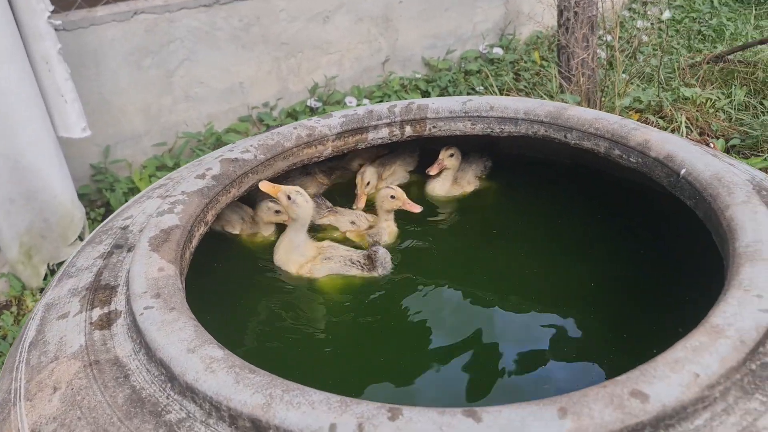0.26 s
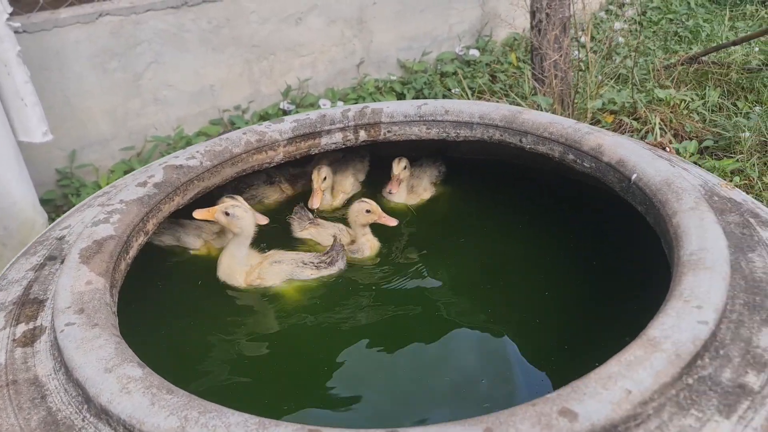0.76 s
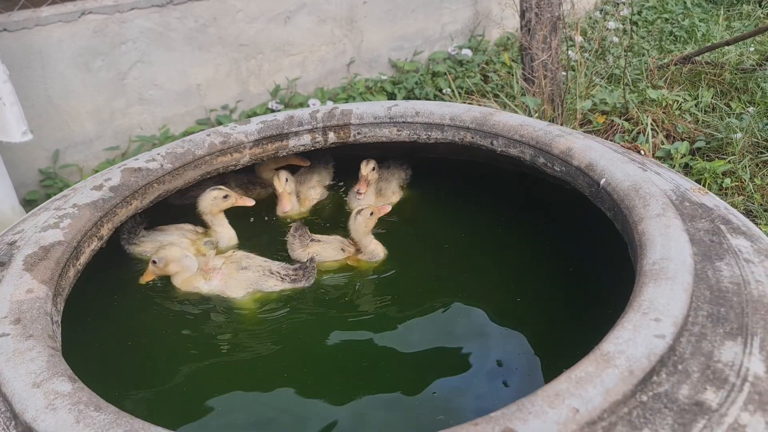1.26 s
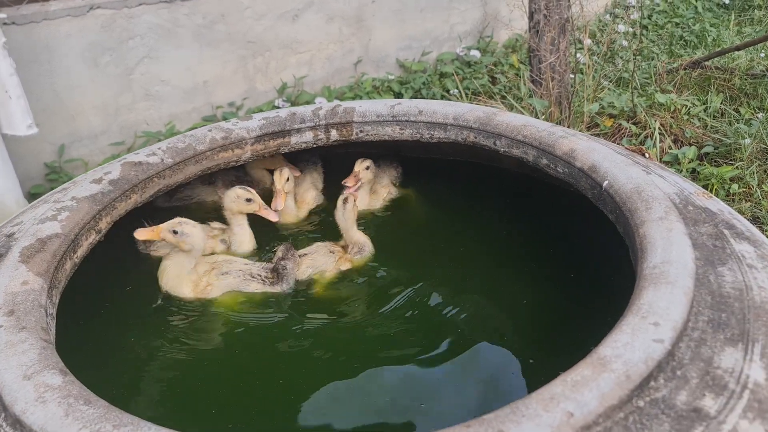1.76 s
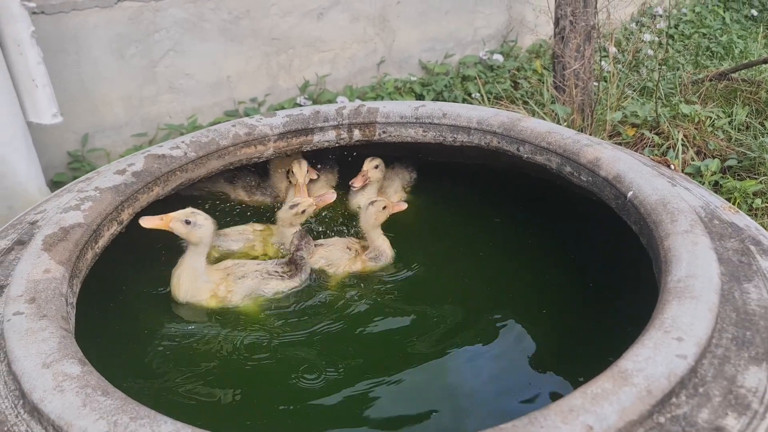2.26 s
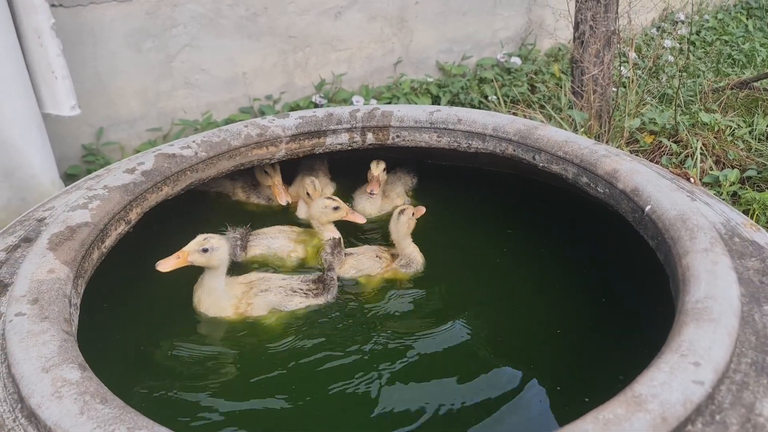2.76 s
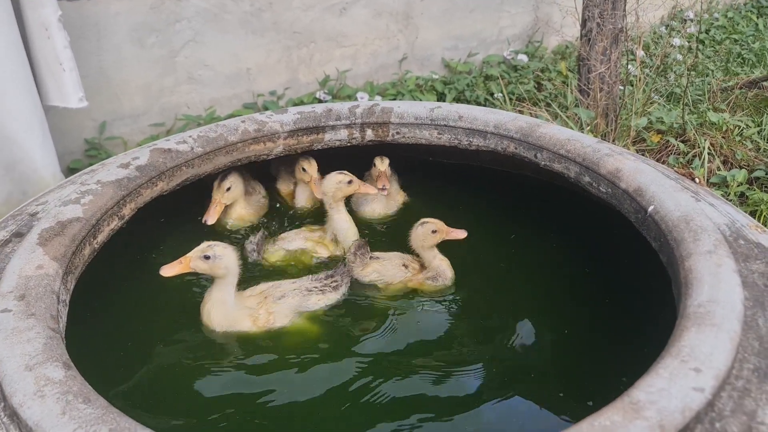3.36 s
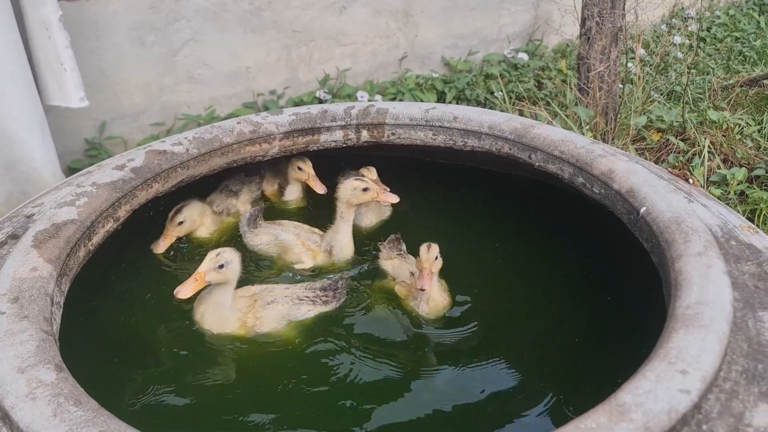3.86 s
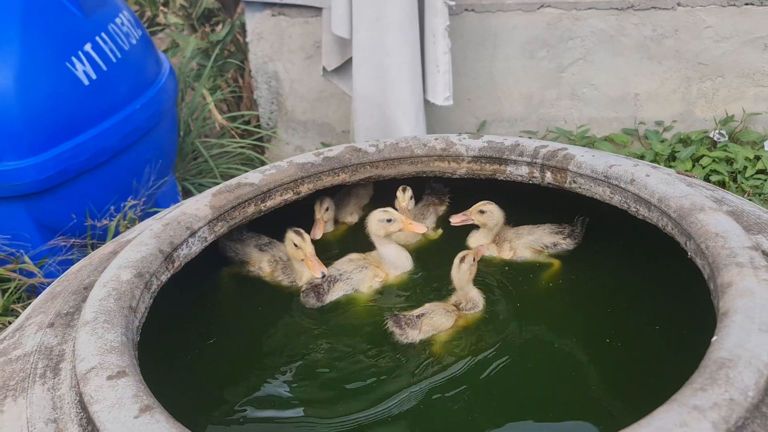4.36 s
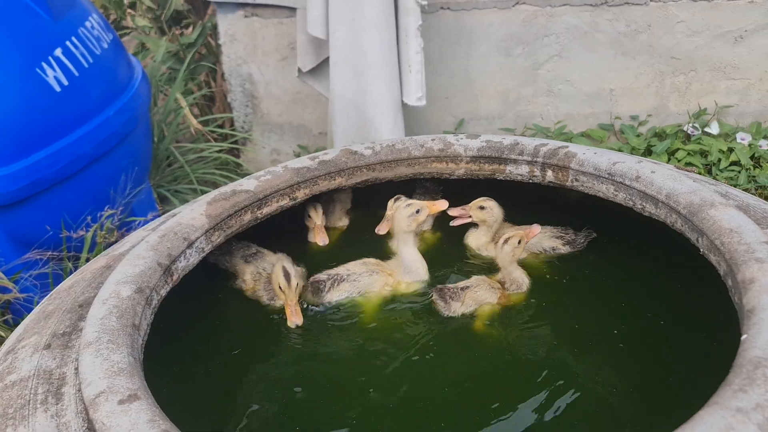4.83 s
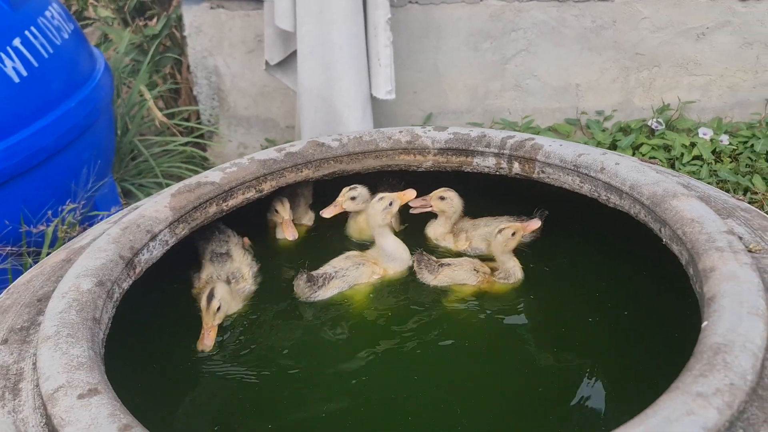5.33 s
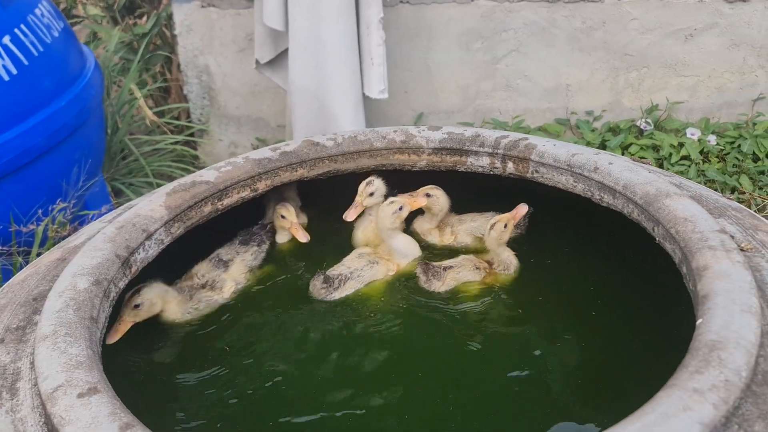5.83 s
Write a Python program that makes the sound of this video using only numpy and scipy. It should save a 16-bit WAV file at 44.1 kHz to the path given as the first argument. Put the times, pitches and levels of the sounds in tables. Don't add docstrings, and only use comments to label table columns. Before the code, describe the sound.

Ducklings paddling in a water-filled clay jar: regular piercing peeps, a sharp splash, tiny bill ticks, then higher sibling cries, outdoors and close.

```python
import sys
import numpy as np
from scipy import signal
from scipy.fft import rfft, irfft, next_fast_len
from scipy.io import wavfile
from scipy.ndimage import uniform_filter1d, map_coordinates

SR = 44100
rng = np.random.default_rng(int(sys.argv[2]) if len(sys.argv) > 2 else 0)


def volts(x):
    e = np.asarray(x, float) / 20
    return 10 ** e


def wav_out(sig):
    wavfile.write(sys.argv[1], SR, np.round(np.clip(np.atleast_2d(sig).T, -1, 1) * 32767).astype(np.int16))


N = 268569
T = np.arange(N) / SR
GAP_START_S, GAP_END_S = 3.955, 3.999
EAR = np.array([[1], [-1]])
LAG_S = 0.0001


def unit(x):
    return x / np.sqrt(np.mean(x ** 2) + 1e-20)


def along(points, hz):
    f, v = np.transpose(points)
    return np.interp(np.log(hz + 1), np.log(f + 1), v)


def wobble(rate):
    knots = rng.standard_normal(int(N * rate / SR) + 4)
    return map_coordinates(knots, [T * rate])


def filtered(x, response):
    m = next_fast_len(x.shape[-1] + 8192)
    spectrum = rfft(x, m) * response(np.fft.rfftfreq(m, 1 / SR))
    return irfft(spectrum, m)[..., :x.shape[-1]]


def coloured(x, points):
    return filtered(x, lambda hz: volts(along(points, hz)))


def sides(pan_db):
    g = volts(np.array([pan_db / 2, -pan_db / 2]))
    return (g / np.sqrt(np.mean(g ** 2)))[:, None]


def add(out, s, x):
    part = out[:, round(s * SR):][:, :x.shape[-1]]
    part += x[..., :part.shape[1]]


# (f/Hz, correlation)
PORT_LIKENESS = [(25, .75), (60, 0.93), (240, 0.74), (950, -0.46), (3770, 0.17), (15000, 0.01)]


def rush(spectrum, patchy_db):
    z = signal.stft(rng.standard_normal((2, N + 512)), nperseg=512)[2]
    field = uniform_filter1d(rng.standard_normal(z.shape[1:]), size=5, axis=0)
    field = uniform_filter1d(field, size=10, axis=1)
    pair = signal.istft(z * volts(patchy_db * unit(field)), nperseg=512)[1][:, :N]

    def mid_side(hz):
        turn = np.arccos(np.clip(along(PORT_LIKENESS, hz), -1, 1)) / 2
        return volts(along(spectrum, hz)) * [np.cos(turn), np.sin(turn)]

    mid, side = filtered(pair, mid_side)
    return unit(np.array([mid + side, mid - side]))


# (f/Hz, level/dB per Hz)
TRAFFIC = [(88, -38), (150, -19), (221, -16.5), (396, -13), (454, -17), (491, -11.5), (768, -14),
           (1320, -19.5), (2110, -23), (2610, -19), (3110, -18.5), (11000, -45.5), (13000, -50),
           (15600, -52)]
# (f/Hz, level/dB per Hz)
TYRES = [(70, -40), (100, -3), (130, 0), (165, -5), (210, -40)]
# (f/Hz, level/dB per Hz)
CHATTER = [(1800, -30), (2500, -19), (2900, -5), (3700, -12), (4500, 6), (5200, -15.5)]


def traffic_and_birds():
    before = T < GAP_END_S
    traffic = volts(np.where(before, -58, -54)) * rush(TRAFFIC, patchy_db=3.0)
    birds = volts(np.where(before, -68.5, -58)) * rush(CHATTER, patchy_db=5)
    tyres = volts(-59) * (T < GAP_START_S) * rush(TYRES, patchy_db=2.5)
    return traffic + birds + tyres


# (t/s, level/dB)
MOTOR = [(0.0, -55), (0.13, -53), (0.29, -67.5), (0.52, -36), (0.81, -57), (0.95, -37.5), (1.41, -58.5),
         (1.8, -50), (2.63, -61), (2.76, -34.5), (3.1, -54.5), (4.07, -52), (4.16, -32), (5.0, -46),
         (5.22, -38), (5.85, -55.5), (6.0, -33), (6.09, -41)]
# (f/Hz, level/dB per Hz)
RUMBLE = [(12, -54), (20, -33), (45, -1), (65, 3), (135, -11), (195, -21), (214, -20), (260, -24.5),
          (340, -55), (570, -120)]
# (from t/s, to t/s, f/Hz, level/dB)
DRONES = [
    (0, 1.8, 397, -69),
    (0, 1.66, 494.6, -78.5),
    (2.2, 3.1, 602, -69.5),
    (3.15, 3.6, 528, -68.5),
]


def motors():
    hum_db = np.interp(T, *np.transpose(MOTOR))
    speed_hz = 82.4 + 1.5 * wobble(6.0)
    out = volts(hum_db + 2.5 + 1.5 * wobble(13)) * np.sin(2 * np.pi * np.cumsum(speed_hz) / SR)
    for start, end, hz, db in DRONES:
        out = out + volts(db + 1.4 * wobble(9.9)) * (T > start) * (T < end) * np.sin(2 * np.pi * hz * T)
    rumble_db = -45 + 0.11 * (hum_db - hum_db.mean())
    return out + volts(rumble_db) * rush(RUMBLE, patchy_db=3.0)


# (f/Hz, level/dB per Hz)
WINGS = [(9500, -28), (10300, -8), (10800, -0.5), (11500, -6.5), (12200, -29)]


def insect():
    swell = np.clip(((T - .285) % .632) / 0.095, .3, 1)
    strokes = 1 + 0.48 * np.sin(2 * np.pi * 95 * T)
    return volts(-74) * swell * strokes * rush(WINGS, patchy_db=-1.4)


# (f/Hz, level/dB per Hz)
HISS = [(2350, -33.5), (4000, -13), (4590, -10.5), (7660, -14.5), (8890, -34), (10900, -15.5), (15600, -17)]
SWISH = [(150, -44), (250, -10.5), (504, -12), (579, -11), (968, -17), (2740, -8), (5000, -12.5),
         (6500, -44.5), (11000, -120)]
# (from t/s, peak t/s, to t/s, hiss level/dB, body level/dB)
SHAKES = [
    (1.022, 1.131, 1.3, -62, -76.5),
    (4.0, 4.23, 4.43, -60, -59),
]


def feathers():
    hiss, swish, out = rush(HISS, patchy_db=-2.0), rush(SWISH, patchy_db=2.5), np.zeros((2, N))
    hiss = unit(hiss * volts(3.0 * wobble(250)))
    for start, peak, end, hiss_db, body_db in SHAKES:
        swell_db = np.interp(T, [start, peak, end], [-12, 0, -12])
        edge = np.clip(np.minimum(T - start, end - T) / 0.035, 0, 1)
        out += edge * volts(swell_db) * (volts(hiss_db + 12.5) * hiss + volts(body_db + 22.5) * swish)
    return out


# (f/Hz, level/dB, t60/s)
CLAY = [(343, 0, 0.28), (496, 3.5, 0.15), (634, 3, 0.17), (748, -31, 0.35), (975, -31, 0.072),
        (1410, -18, 0.05)]


def knock():
    out, t = np.zeros((2, N)), np.arange(SR // 5) / SR
    clay = sum(volts(db - 60 * t / t60) * np.sin(2 * np.pi * hz * t) for hz, db, t60 in CLAY)
    add(out, 5.617, volts(-38) * clay * sides(-2.6))
    return out


# (t/s, peak level/dB, f/Hz, t60/s, rise share)
BUBBLES = [(0.269, -49, 343, 0.082, 0.089), (.642, -39.5, 1710, 0.024, 0.11),
           (0.659, -40, 1350, 0.02, 0.13), (.853, -52.5, 700, .04, 0.14),
           (1.159, -47.5, 1640, 0.028, 0.092), (2.002, -34, 707, 0.064, 0.06),
           (2.007, -38.5, 1245, 0.047, .05), (2.078, -30.5, 581, .12, 0.18),
           (2.079, -36.5, 1110, 0.04, 0.061), (2.127, -35, 1160, 0.052, 0.5),
           (2.652, -39.5, 1324, 0.024, .1), (3.127, -22.5, 1354, 0.044, 0.056),
           (3.6, -56, 748, 0.16, 0.018), (4.15, -50, 590, .12, .03), (4.25, -44, 395, .16, -.03)]


def bubbles():
    out, t = np.zeros((2, N)), np.arange(SR // 5) / SR
    for s, db, hz, t60, rise in BUBBLES:
        ring = np.sin(2 * np.pi * hz * (t + rise * t * t / t60)) * (1 - np.exp(-t / 0.0022))
        add(out, s, volts(db + 5.0 - 60 * t / t60) * ring * sides(-5.0))
    return out


# (f/Hz, level/dB)
SPRAY = [(2000, -18.5), (3000, -2.5), (4500, 7), (7000, -15), (9500, -30), (12000, -24), (16000, -22)]
SLAP = [(400, -20), (800, 3.5), (1400, 5.5), (2200, -2.5), (3000, -25.5)]
# (t/s, peak level/dB, slap level/dB, left-right level/dB, t60/s)
SPLASHES = [(0.3325, -40.5, -12.5, -8, 0.036), (0.35, -47, -23, -4.5, 0.047),
            (0.461, -45.5, -6.5, -7.5, 0.035), (0.5139, -54, 4, -7, 0.04), (0.8509, -36.5, -4, -4.5, 0.04),
            (0.937, -52.5, 2.5, -3.5, 0.05), (1.0349, -47, -2.5, -1, 0.046),
            (1.0594, -45, -10.5, -4.5, 0.031), (1.288, -40.5, -19, -4, 0.04),
            (1.3034, -34, -30.5, -17.5, 0.031), (1.6596, -40.5, -20.5, -4, 0.026),
            (1.994, -50, 6.5, -10, 0.047), (2.2746, -37, -33, -15, 0.035), (3.0897, -50, -20, -8, 0.02),
            (3.1245, -18.5, -5.5, -8.5, 0.044), (3.1344, -23.5, -4, -8.5, 0.053),
            (3.1588, -32, -8.5, -4, 0.031), (3.2125, -39, -10, -4, .04), (3.2305, -36, -19, -3.5, 0.062),
            (4.6945, -32.5, -24.5, -7, 0.021), (4.9882, -58, -11, -8, 0.024),
            (5.0399, -34.5, -18, -2, 0.032), (5.216, -31.5, -21, -0.5, 0.034),
            (5.616, -52.5, 4, -12.5, 0.029)]


def splashes():
    out, t = np.zeros((2, N)), np.arange(SR // 5) / SR
    for s, db, slap_db, pan_db, t60 in SPLASHES:
        noise = rng.standard_normal((3, len(t)))
        spikes_db = 1.8 * rng.standard_normal(len(t) // 40 + 1).repeat(40)[:len(t)]
        grains = (noise[0] + .45 * noise[1:]) * volts(spikes_db)
        burst = unit(coloured(grains, SPRAY)) + volts(slap_db) * unit(coloured(grains, SLAP))
        envelope = volts(db + 1.5 - 60 * t / t60) * (1 - np.exp(-t / 0.0022))
        add(out, s - .002, envelope * burst * sides(pan_db))
    return out


# (f/Hz, level/dB)
SNAP = [(2500, -25), (5000, -4), (8000, -2), (9500, -8), (12000, -3), (15000, 0), (16000, -10)]
# (t/s, peak level/dB, t60/s)
TICKS = [(0.5147, -57, 0.018), (1.6586, -47, 0.018), (2.3306, -45, 0.018), (2.4049, -40, 0.018),
         (3.1253, -36, 0.018), (3.2321, -48, 0.018), (3.7633, -51, 0.018), (4.6932, -51, 0.018),
         (4.9781, -55, 0.018), (5.0424, -48, 0.018), (5.1744, -53, 0.018), (5.216, -42, 0.018),
         (5.2659, -52, 0.018), (5.6166, -50, 0.018)]


def ticks():
    out, t = np.zeros((2, N)), np.arange(SR // 20) / SR
    for s, db, t60 in TICKS:
        noise = rng.standard_normal((3, len(t)))
        snap = unit(coloured(noise[0] + .6 * noise[1:], SNAP))
        add(out, s - .001, volts(db - 3 - 60 * t / t60) * (1 - np.exp(-t / .0007)) * snap)
    return out


def call(row, head, tones, shape, flap, depth):
    s, length, hz, climb, db = row
    swell_db, pan_db, lead_us, settle_hz, arch_db = head
    (db2, pan2, rad2, db5), (db3, pan3, rad3, rad5) = tones
    (over_hz, over_s, settle_s), (soft_s, soft_db, attack_s), (drop_hz, drop_s, fade_db) = shape
    at = slice(round((s - .01) * SR), round((s + length + .004) * SR))
    t, beat = T[at] - s, flap[at]
    rising = np.clip((t - soft_s) / attack_s, 0, 1)
    ending = np.clip(1 + (t - length) / drop_s, 0, 2)
    depth = depth[at] + .4 * np.maximum(1 - rising, np.minimum(ending, 1))

    sharp = 2.4

    def jerk(late_rad):
        return np.exp(sharp * (np.cos(beat - late_rad) - 1))

    overshoot = over_hz * np.exp(-((t - .004) / over_s) ** 2 / 2)
    settling = settle_hz * np.clip(1 - abs(t) / settle_s, 0, 1) ** 2
    pitch = hz + climb * t + overshoot + settling - drop_hz * ending ** 2.6
    pitch = pitch + depth * 520 * (jerk(0) - 1 / np.sqrt(2 * np.pi * sharp))
    phase = 2 * np.pi * np.cumsum(pitch) / SR

    level = db + soft_db * (1 - rising) + swell_db * (t / length - .5) + fade_db * ending ** 2
    level = level + arch_db * (.5 - (2 * t / length - 1) ** 2)
    level = level + 1.5 * np.exp(-((t - soft_s - attack_s) / .005) ** 2 / 2)
    strength = 1 + depth * (.2 - 1.15 * jerk(-.5) + .3 * jerk(1.3))

    rasp = .09 * unit(uniform_filter1d(rng.standard_normal(len(t)), size=60))
    drift = .28 * unit(uniform_filter1d(rng.standard_normal(len(t)), size=900))
    source = phase + rasp + EAR * np.pi * pitch * LAG_S
    upper = 0
    for k, tone_db, pan, lead in ((2, db2, pan2, rad2), (3, db3, pan3, rad3),
                                  (4, -58, -2.5, 2.9), (5, db5 + 2.5, -1.5, rad5)):
        between = EAR * (lead / 2 + (k - 1.85) * drift)
        upper = upper + volts(tone_db) * sides(pan) * np.sin(k * source + between)
    tone = np.sin(phase + EAR * np.pi * pitch * lead_us / 1e6) * sides(pan_db)
    tone = tone + (.45 + .55 * rising ** 2) * upper
    edge = np.clip(np.minimum((t + .01) / .011, (length + .004 - t) / .004), 0, 1) ** 2
    return np.sqrt(2) * volts(level) * edge * strength * tone


# (from t/s, to t/s, depth as a share, flap rate f/Hz)
FLUTTERS = [(1.186, 1.224, .5, 110), (1.256, 1.274, .4, 130), (1.462, 1.496, .6, 140),
            (1.75, 1.786, .5, 90), (2.069, 2.145, .6, 115), (2.346, 2.375, 0.58, 110),
            (2.416, 2.455, .6, 129), (2.665, 2.673, 0.78, 120), (2.692, 2.75, .8, 105),
            (2.978, 3.06, .4, 124), (3.586, 3.622, .55, 134), (3.66, 3.68, .7, 130),
            (3.904, 3.933, 0.52, 126), (4.494, 4.527, .45, 105), (4.773, 4.83, .6, 110),
            (4.836, 4.885, .9, 150), (5.078, 5.091, .9, 135), (5.103, 5.175, .8, 135),
            (4.549, 4.557, .6, 130), (5.392, 5.462, .7, 125), (5.71, 5.772, .9, 131),
            (5.995, 6.038, .9, 135)]


def membrane():
    depth, rate = np.full(N, 0.028), np.full(N, 127.)
    for start, end, share, flaps in FLUTTERS:
        inside = (T > start) & (T < end)
        depth[inside], rate[inside] = share, flaps
    depth = uniform_filter1d(depth, size=130) * volts(1.3 * wobble(80))
    return 2 * np.pi * np.cumsum(rate * (1 + .16 * wobble(60))) / SR, depth


# (t/s, length t/s, f/Hz, climb f/Hz per s, level/dB)
FAR = [(.155, .06, 4350, 2000, -63), (.24, .09, 4300, -4000, -62), (.35, .09, 1500, -100, -64),
       (.245, .06, 2820, -1500, -63), (.27, .035, 4200, -200, -62), (.545, .09, 2730, -100, -60),
       (.51, .11, 4700, -200, -68), (.955, .08, 4150, -1200, -57)]
CRIES = [
    (5.445, .135, 3900, 7000, -32),
    (5.44, .143, 3200, 7600, -25),
    (5.47, .11, 2950, 6000, -44),
    (5.795, .13, 4290, 2800, -30),
    (5.79, .135, 3520, 6600, -28),
    (5.81, .11, 3250, 6500, -45),
]
CHEEPS = [(4.315, .025, 3090, -600, -28), (4.35, .012, 3080, -9000, -34.5), (4.5, .08, 2240, -600, -36),
          (4.84, .075, 3800, -1500, -35), (4.885, .022, 3000, -200, -33.5), (5.082, .07, 4245, -5000, -29),
          (5.085, .08, 3817, -6000, -26.5), (5.27, .06, 4430, -900, -50), (5.42, 0.022, 3530, 6006, -37),
          (5.6, 0.046, 4430, -300, -54)]
# (swell level/dB, left-right level/dB, left lead t/us, slow settling f/Hz)
SIBLING_HEAD = (1, -9, 10, 30)
SIBLING_TONES = (-25, -4, .6, -56), (-44, -2, .3, .3)
# (final drop f/Hz, drop t/s, fade level/dB)
PEEP = (900, .0052, .055), (.008, -17, .01), (620, .021, -11)
CRY = (400, .005, 0.025), (.002, -12, .012), (1350, .05, -5)
CHEEP = (60, .008, .02), (.001, -8, .01), (120, 0.02, -5)
# (t/s, length t/s, held f/Hz, climb f/Hz per s, level/dB)
PEEPS = [(1.175, .101, 2470, 700, -21.5), (1.442, .11, 2520, 1700, -17.5), (1.726, .116, 2650, 300, -17.5),
         (2.034, .112, 2820, -300, -13.5), (2.33, .128, 2500, 2800, -19.5),
         (2.624, .126, 2720, 1800, -16.5), (2.934, .131, 2830, 600, -15), (3.235, .133, 2780, 400, -13),
         (3.544, .141, 2784, 805.5, -19), (3.862, .105, 2740, 1300, -13), (4.19, .111, 2444, 105, -26),
         (4.477, .114, 2580, 50, -20.5), (4.758, .131, 2620, 1200, -22), (5.058, .122, 2620, 900, -22.5),
         (5.362, .125, 2660, 700, -22), (5.662, .123, 2660, 900, -21.5), (5.975, 0.12, 2690, -300, -20.5)]
# (swell level/dB, left-right level/dB, left lead t/us, slow settling f/Hz)
HEAD = [(2.5, -6.5, 69.5, 450), (1, 2, 39.5, 850), (-2.5, -2.5, 23, 750), (-5, 2.5, -25.5, 450),
        (4.5, -8, -5.5, 800), (6, -9, -32.5, 450), (8, -8, -35, 200), (4, -14.5, 6, 250),
        (3.5, -6.5, -43, 100), (7, -9.5, -8.5, 100), (-0.5, -8, 37, 500), (5, -11.5, 82.5, 300),
        (5, -6, -33, 550), (-0.5, -9.5, 81, 550), (8, -11, -43.5, 600), (-4, -11, -47, 550),
        (6.5, -6, -24.5, 450)]
ARCH_DB = [3, .6, .6, .6, 5, .6, .6, 6, 2.5, .6, .6, 2.5, .6, .6, .6, .6, .6]
# (2nd level/dB, left-right level/dB, left lead/rad, 5th level/dB)
SECOND = [(-25.1, -7.0, -2.8, -48.5), (-26.1, 1.9, -2.3, -48.4), (-23.7, 0.8, 1.49, -57.8),
          (-30.2, -0.2, 2.17, -56.9), (-20.8, -3.3, 1.55, -51.0), (-24.5, -2.3, 2.01, -49.4),
          (-22.8, 0.2, 1.83, -47.4), (-26.3, -0.8, 2.48, -51.2), (-22.6, 1.9, 2.05, -46.4),
          (-31.0, -4.0, 2.2, -54.0), (-29, -1.5, 1.26, -52), (-21.5, -2.0, 0.63, -52.5),
          (-19.4, 0.5, 1.4, -45.1), (-18.6, 1.2, 1.68, -43.8), (-21.0, -2.6, 1.97, -47.8),
          (-20.9, -1.0, 2.27, -47.9), (-24.7, -6.7, -0.03, -49.9)]
# (3rd level/dB, left-right level/dB, left lead/rad, 5th lead/rad)
THIRD = [(-34.5, 6.0, -2.51, 0.33), (-30.1, 7.5, -2.41, -0.36), (-37.3, 7.2, -2.63, 1.87),
         (-35.9, 5.3, -2.0, 0.16), (-30.3, 6.9, -2.17, -1.25), (-36.9, 4.1, 2.97, 0.12),
         (-35.1, 1.5, 2.94, 0.89), (-39.2, 2.9, -0.85, 2.42), (-37.6, 0.5, -2.54, 1.91),
         (-36.3, -2.2, 2.27, 0.8), (-42, 4.3, 2.5, -1.54), (-30.7, 3.8, -1.22, -2.73),
         (-32.4, 2.8, 0.03, 2.94), (-31.2, 1.8, 3.03, -0.27), (-32.9, 9.0, 2.08, 2.9),
         (-31.7, 10.2, -0.92, -0.32), (-32.8, 10.7, 0.05, -0.54)]
# (f/Hz, level/dB)
THROAT = [(1800, -26), (2100, -15), (2350, -4), (2900, .5), (3300, 3), (3800, -2), (4500, 0.5)]


def ducklings():
    out = np.zeros((2, N))
    flap, depth = membrane()
    shimmer = volts((.5 + 2.4 * depth) * wobble(90) + .7 * wobble(25))
    for row, head, arch_db, *tones in zip(PEEPS, HEAD, ARCH_DB, SECOND, THIRD):
        add(out, row[0] - .01, call(row, (*head, arch_db), tones, PEEP, flap, depth))
    for rows, shape, flap_depth in ((CRIES, CRY, .1), (CHEEPS, CHEEP, .1), (FAR, CHEEP, .7)):
        for row in rows:
            voice = call(row, (*SIBLING_HEAD, 1.5), SIBLING_TONES, shape, flap, np.full(N, flap_depth))
            add(out, row[0] - .01, voice)
    return coloured(out * shimmer, THROAT)


# (t/ms, left level/dB, right level/dB)
JAR = [(1.1, -31.5, -14.5), (2.3, -13.5, -22.5), (3.7, -24.5, -21.5), (5.9, -33.5, -22),
       (9.2, -14.5, -13.5)]
# (f/Hz, t60/s)
WALLS = [(300, 0.26), (2800, 0.32), (8000, 0.19)]


def space(x):
    def rim(f):
        echoes = sum(volts([[l], [r]]) * np.exp(-2j * np.pi * f * ms / 1000) for ms, l, r in JAR)
        return 1 + echoes / (1 + (f / 4200) ** 4)

    out = filtered(x, rim)
    for s in np.arange(0, N / SR, .3):
        hz, t, z = signal.stft(rng.standard_normal((2, SR // 2)), SR, nperseg=256)
        decay = volts(-60 * t / along(WALLS, hz)[:, None])
        tail = signal.istft(z * decay, SR, nperseg=256)[1]
        tail = tail / np.linalg.norm(tail[0])
        piece = x[:, round(s * SR):round((s + .3) * SR)].mean(axis=0)
        add(out, s + 0.015, volts(-24.0) * signal.fftconvolve(piece[None], tail, axes=1))
    return out


def scene():
    yard = traffic_and_birds() + motors() + insect()
    water = knock() + bubbles() + splashes()
    near = space(water + ticks() + ducklings())
    near = filtered(near, lambda f: np.exp(-1j * np.pi * f * EAR * LAG_S))
    return yard + feathers() + near


def top_cut(x):
    return signal.sosfilt(signal.butter(12, 15780, fs=SR, output="sos"), x)


# (f/Hz, level/dB)
MIC = [(8400, .3), (9400, -7), (10300, 2.5), (11600, 1.5), (13000, -2.5), (15600, -1), (15800, -40)]


def record(dry):
    outside_gap_s = np.maximum(GAP_START_S - T, T - GAP_END_S)
    gap = np.clip(outside_gap_s / 0.0006, .0005, 1)
    return top_cut(coloured(dry * gap, MIC))


dry = scene()
out = record(dry)
wav_out(out)
```